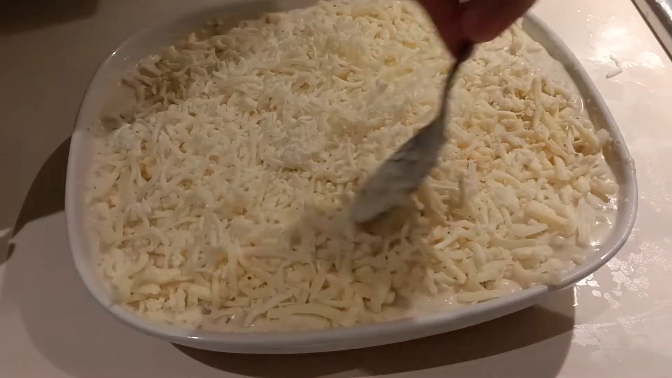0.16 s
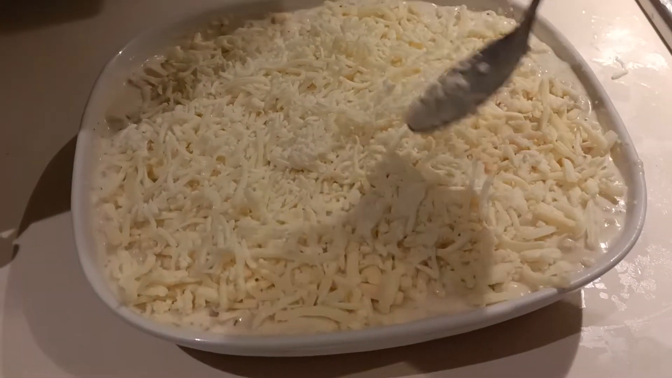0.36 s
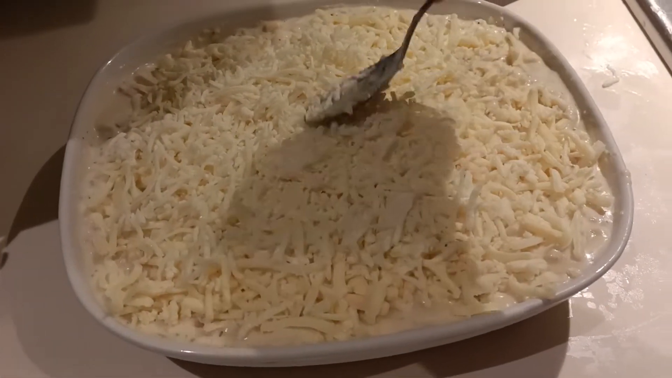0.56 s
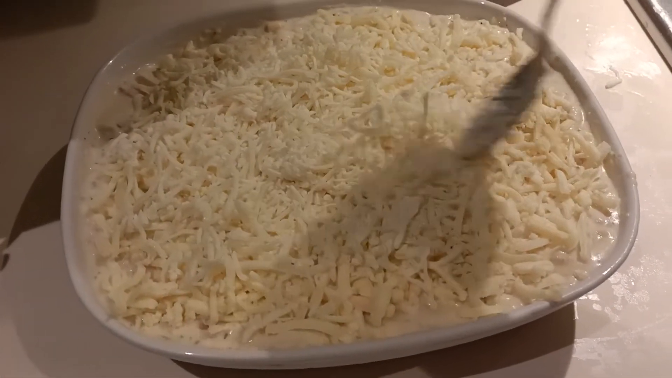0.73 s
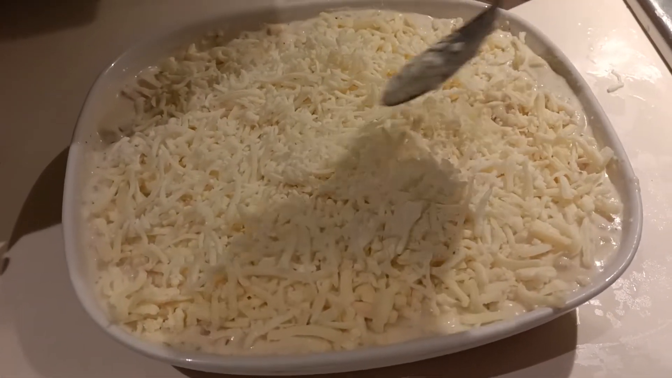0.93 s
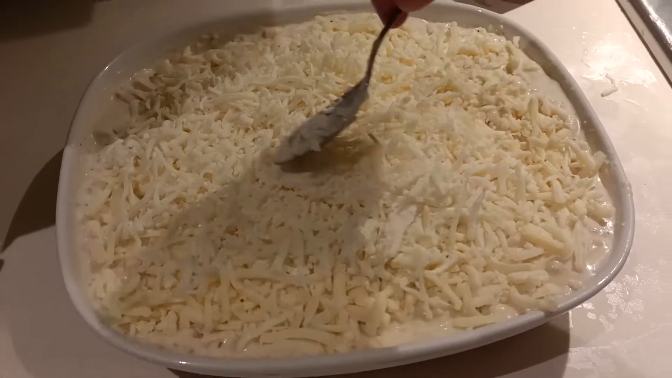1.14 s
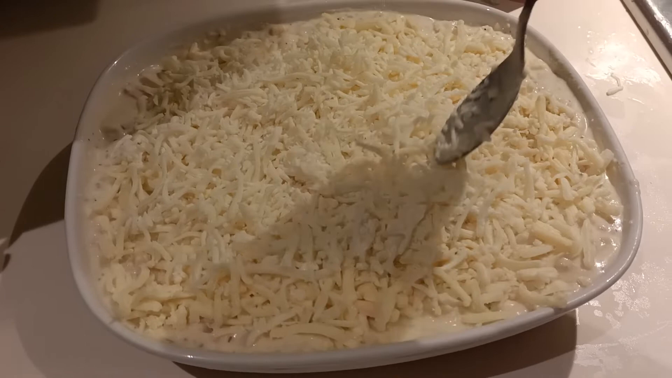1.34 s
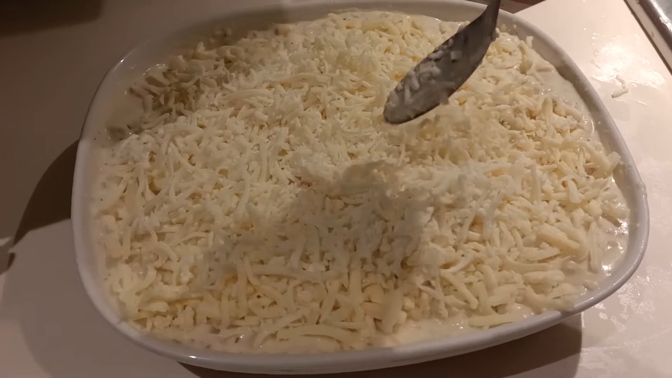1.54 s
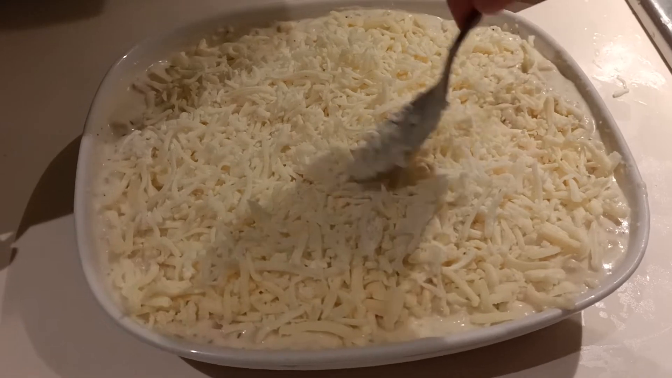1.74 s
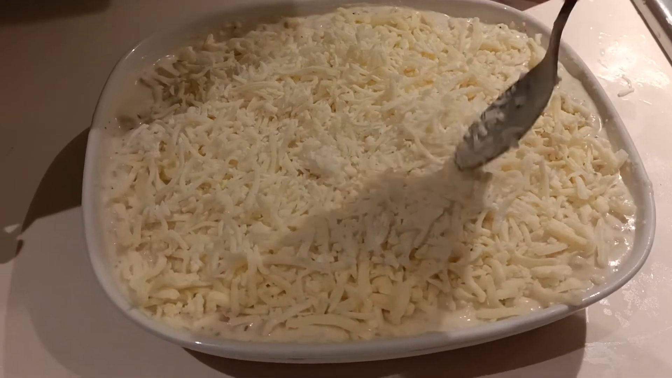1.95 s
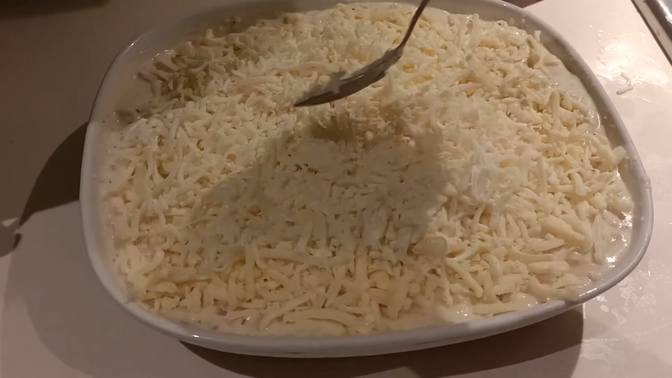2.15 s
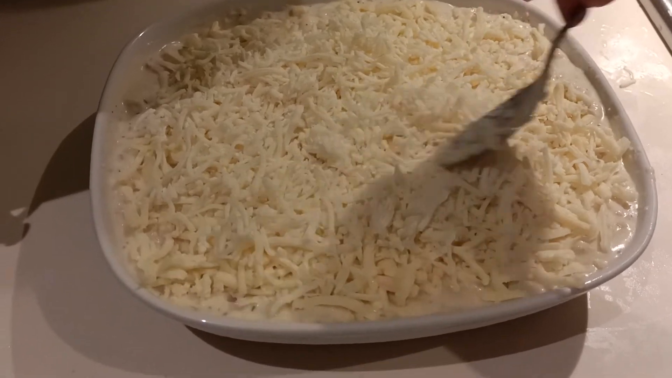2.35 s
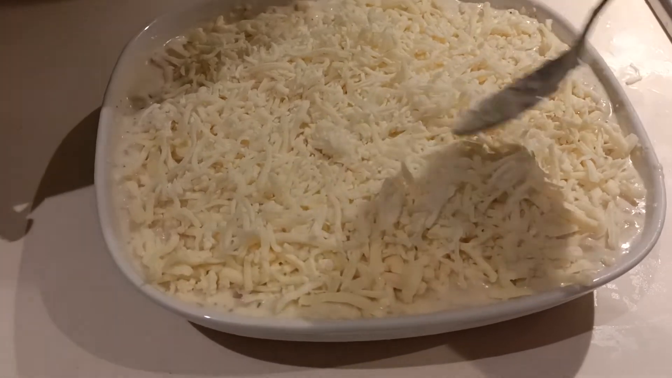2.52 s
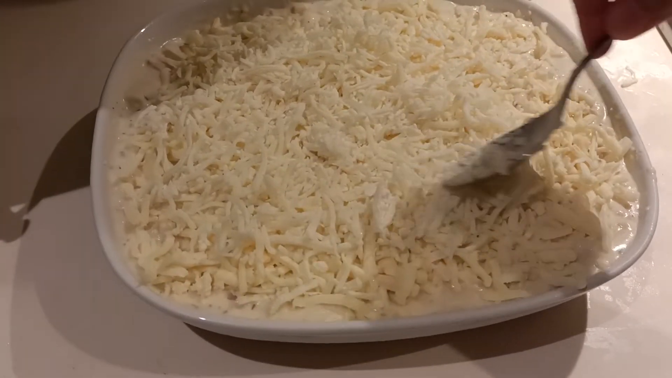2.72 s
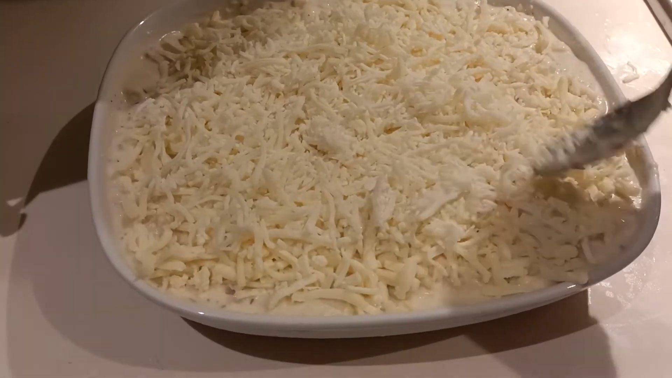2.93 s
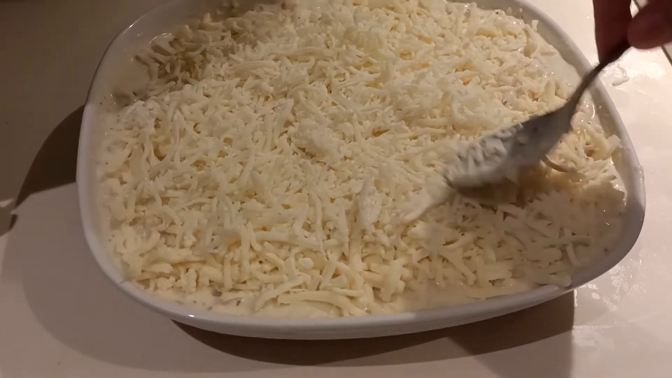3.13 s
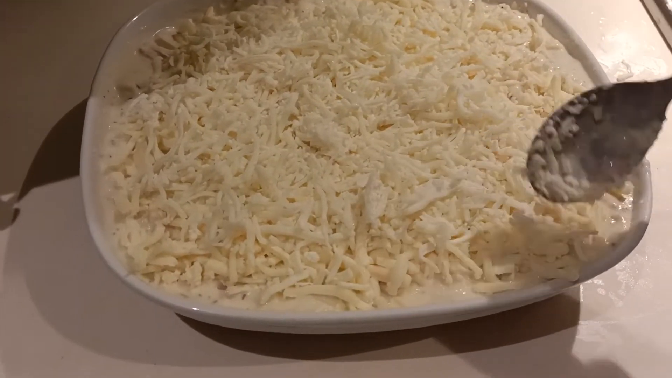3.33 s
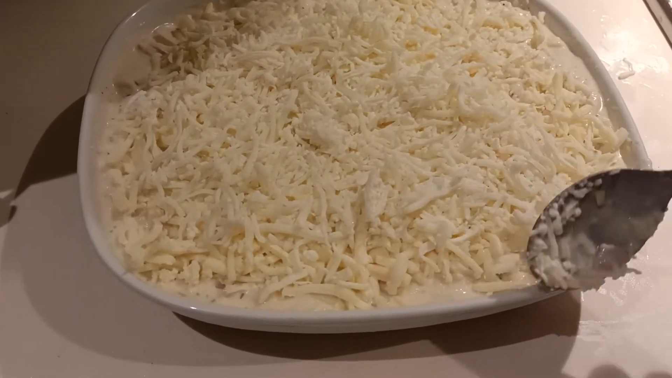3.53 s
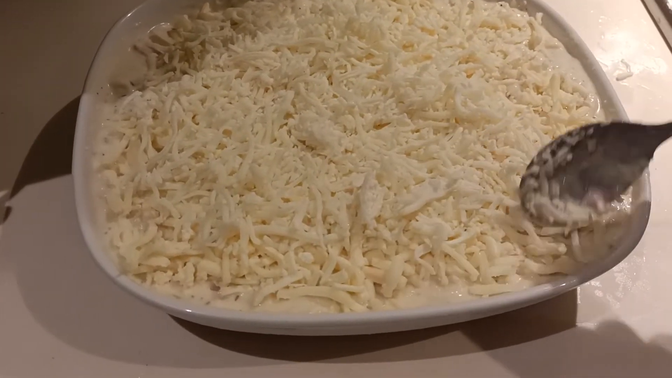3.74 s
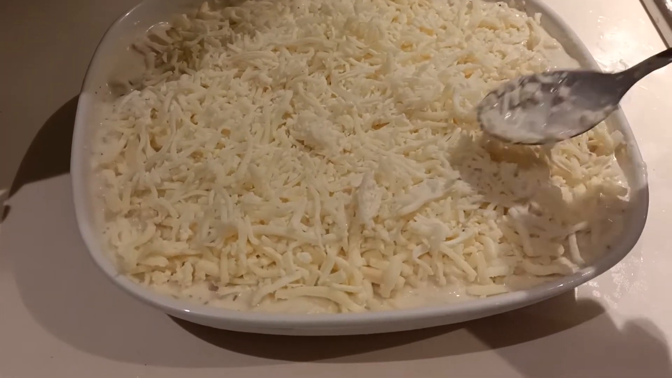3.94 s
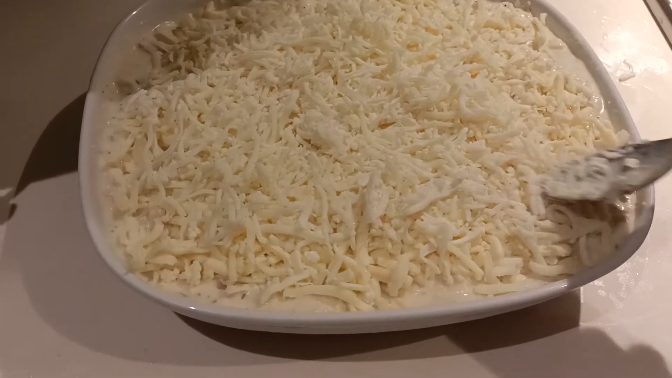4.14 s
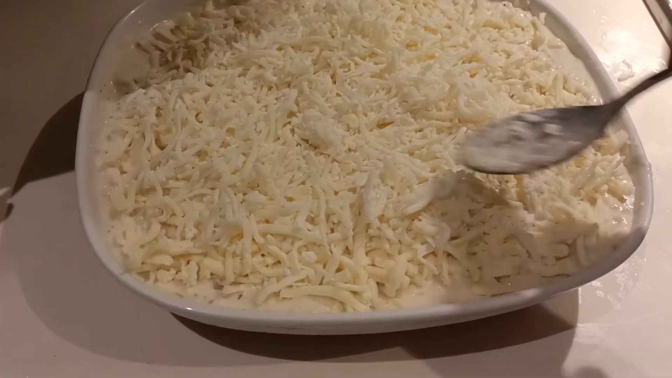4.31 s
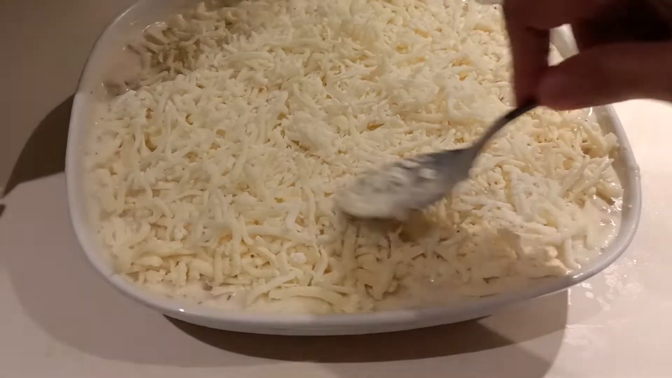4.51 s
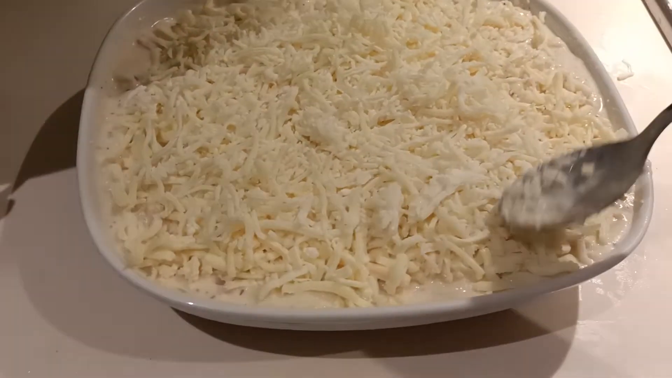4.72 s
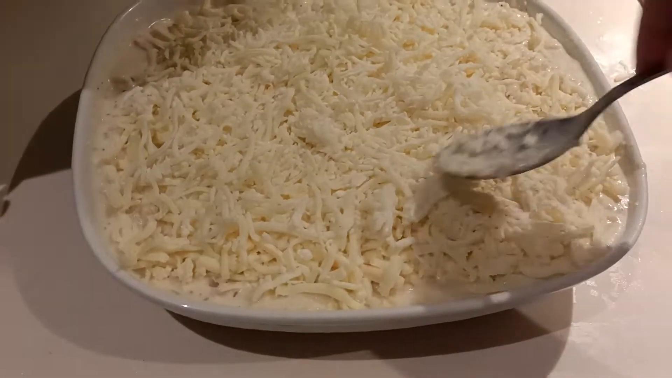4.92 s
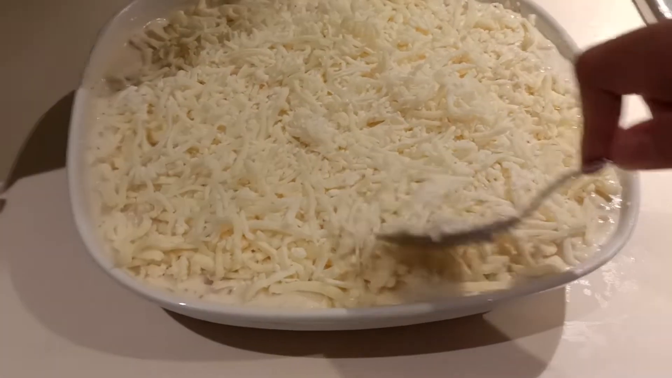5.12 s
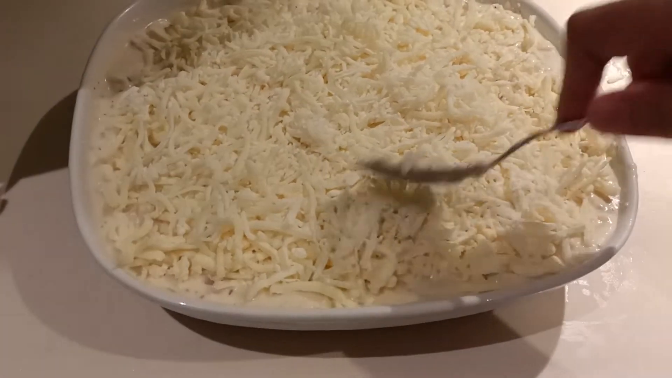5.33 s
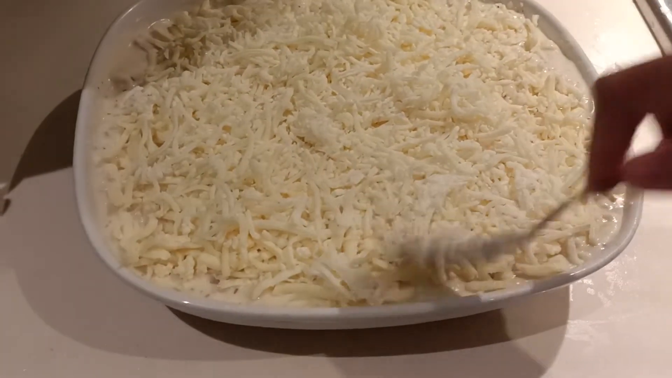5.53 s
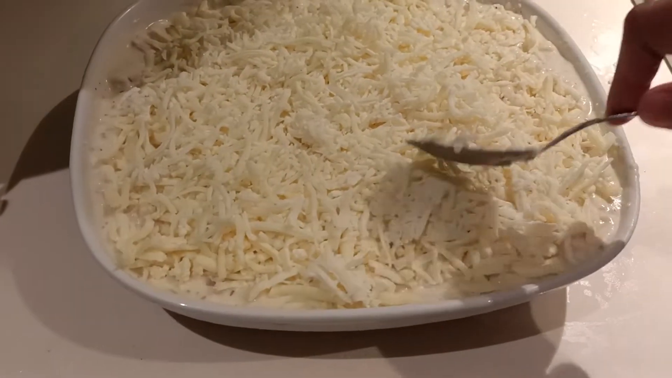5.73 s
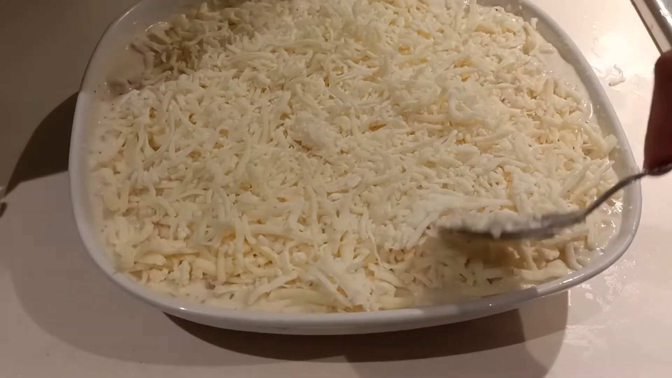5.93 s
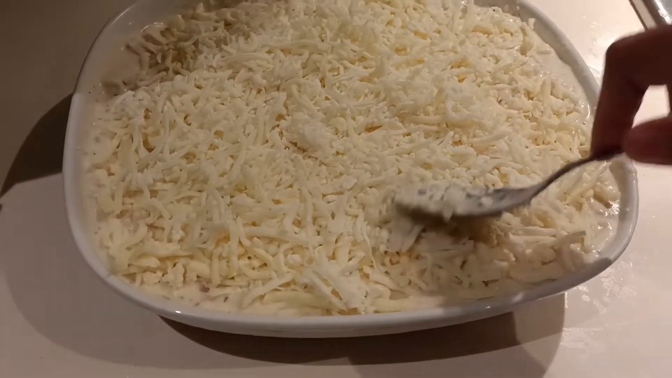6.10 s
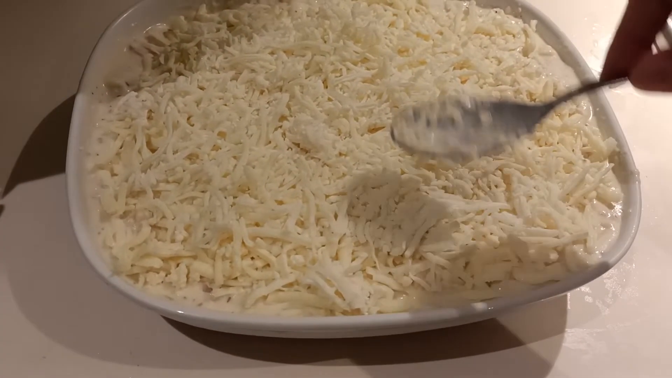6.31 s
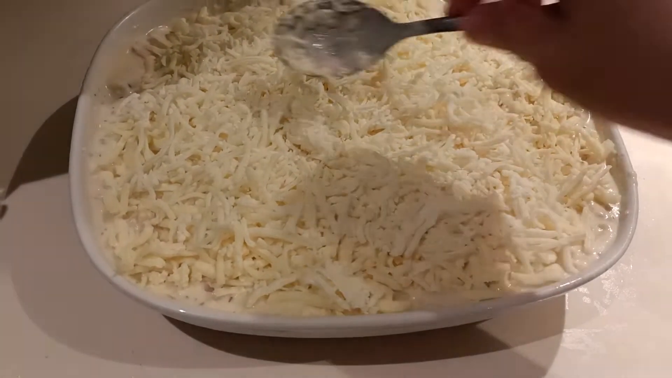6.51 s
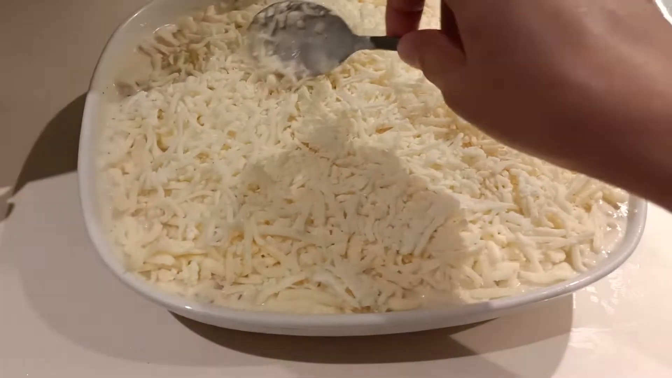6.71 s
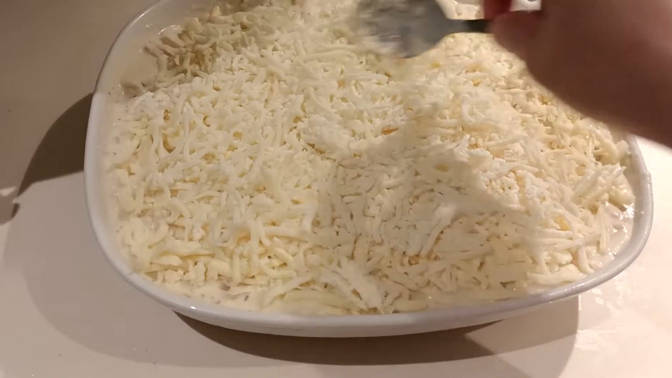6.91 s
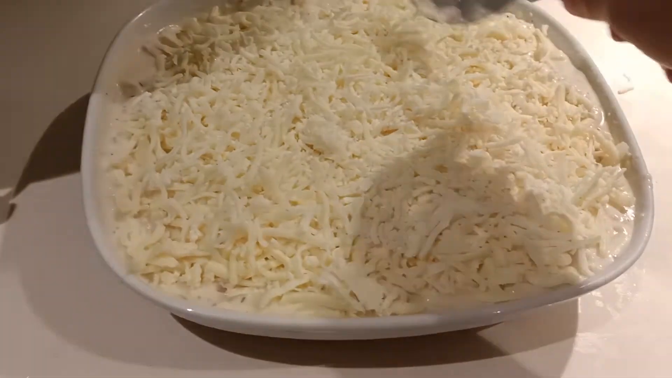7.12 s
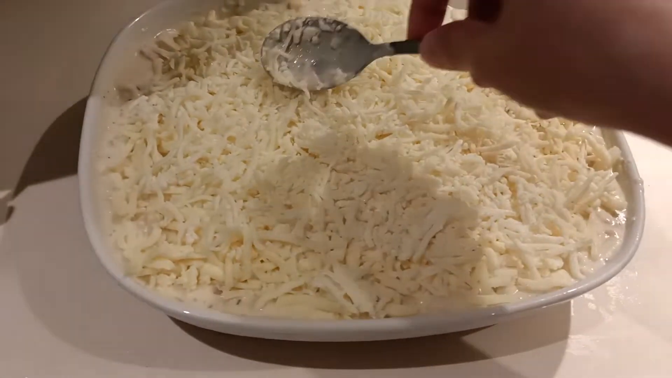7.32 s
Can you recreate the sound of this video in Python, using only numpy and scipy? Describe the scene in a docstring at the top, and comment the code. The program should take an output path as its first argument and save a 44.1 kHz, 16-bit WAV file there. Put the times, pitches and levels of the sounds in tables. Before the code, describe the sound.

A metal spoon softly taps and spreads grated cheese, clinks once on a ceramic dish, then a cupboard door bangs shut.

```python
"""A steel spoon spreads grated cheese in a ceramic baking dish: friction gives soft scrapes, cushioned
impacts give small ticks, and one sharp knock on the rim excites many damped modes.
Further off in the small kitchen, something like a cupboard door is unlatched and bangs shut, its panel
booming at low resonances amid a soft rustle of cloth. An appliance hums underneath.
Two microphones listen from close by."""
import sys
import numpy as np
from scipy import signal
from scipy.fft import rfft, irfft
from scipy.io import wavfile
from scipy.ndimage import uniform_filter1d

SR = 44100
rng = np.random.default_rng(int(sys.argv[2]) if len(sys.argv) > 2 else 0)


def file_out(sig):
    """Save sig as 16-bit WAV at sys.argv[1]."""
    # one column per channel
    cols = np.atleast_2d(sig).T
    # limit, then scale
    lim = np.clip(cols, -1, 1)
    pcm = np.round(lim * 32767).astype(np.int16)
    wavfile.write(sys.argv[1], SR, pcm)


N = 324576
TIME = np.arange(N) / SR


# resonances of the spoon bedded in cheese: pitch_hz, width_hz, gain_db
SPOON_MODES = [(3180, 45, 5.5), (5720, 160, 0), (6150, 96, 3), (7000, 270, -5), (7800, 130, -22.5),
               (9000, 190, 1), (9520, 170, -3), (9980, 200, -6), (10680, 240, 2), (11100, 110, -9),
               (11400, 150, -9), (13800, 300, -4.5)]
# spectrum of contact with cheese: frequency_hz, density_db
CHEESE_COLOUR = [(1500, -22), (3000, -15), (4000, -15), (5000, -14), (6200, 9.5), (8500, 9), (10800, -10),
                 (15000, -22)]
# light taps: start_s, relative_level_db, treble_db
TICKS = [(0.0337, -52, -15), (.18, -53, -3), (.611, -44, -3), (0.6497, -49, -18), (.672, -42, -7),
         (1.14, -47, 0), (1.1617, -37, -9), (1.203, -45, -13.5), (1.223, -45, -3), (1.6276, -53, -10),
         (1.6857, -54, -16), (1.8088, -57, 0), (2.164, -45, -14), (2.2381, -33, -3), (2.252, -32, 1),
         (2.6176, -46, -5), (2.7214, -48.5, -1), (2.755, -51, -3), (3.095, -58, -19), (3.962, -59, -15),
         (4.005, -53.5, -20), (4.0432, -57, -4), (4.101, -58, -20), (4.639, -54, -8)]
def ticks():
    """Cushioned impact: light spoon ticks through cheese, each with its own loudness and brightness."""
    out = np.zeros((2, N))
    contact = (fade(.023) + undb(-11.5) * fade(.18)) * (1 - fade(.0095))
    for start, db, treble_db in TICKS:
        spot_db = 1.5 * rng.standard_normal(len(SPOON_MODES))  # each spot favours different modes
        modes = [(hz, width, level + spot + .84 * (treble_db + 8.5) * (hz > 9000))
                 for (hz, width, level), spot in zip(SPOON_MODES, spot_db)]
        ring = resonate(white() * contact, modes)
        ring += .25 * noise(CHEESE_COLOUR) * contact
        snap = noise([(2800, -14), (4800, -10), (6200, 0), (15000, .6 * treble_db)]) * fade(.016)
        add(out, start, undb(db - 5.5) * (ring + undb(-1) * snap))
    return lean(out, 9.8)


# spectra of the first crack and of the dense modes: frequency_hz, density_db
CRACK_COLOUR = [(60, -5.5), (450, 3), (900, -1.5), (1300, -4), (2200, -6.5), (4000, -11), (8000, -14.5),
                (15000, -3.5)]
KNOCK_COLOUR = [(300, -15.5), (1200, -12.5), (2400, -20), (3100, -3.5), (4500, -0.5), (5600, -7.5),
                (7300, 0), (9300, -9), (11000, -2), (13300, -3.5), (15000, 1), (16000, -26)]
# ring of steel on the rim: pitch_hz, width_hz, gain_db
RIM_MODES = [(2600, 50, -9), (3210, 60, -9), (3670, 130, -8.5), (4470, 130, -4), (5080, 70, -12),
             (6140, 30, -3), (6430, 25, -6), (7320, 25, 0), (7505, 25, -3), (8320, 33, -1), (9518, 15, 0),
             (10270, 35, -6), (10870, 88.6, -0.5), (12200, 25, -7), (13350, 60, -2), (14720, 70, -2)]
# a knock and its rebound: start_s, level_db, relative_crack_db, cutoff_hz
KNOCKS = [(3.5536, -22, 15.5, 15200), (3.5842, -33, -14, 7500)]
def rim_knocks():
    """Hard impact: bare steel on the rim gives a broadband crack, damped modes and a reverberant tail."""
    out = np.zeros((2, N))
    # folding the cepstrum gives a minimum-phase pulse, its energy packed at the start
    cepstrum = irfft(np.log(gains(CRACK_COLOUR, 1024) + .01))[:512]
    crack = irfft(np.exp(rfft(np.r_[0, 2 * cepstrum[1:]], 1024)))
    for start, db, crack_db, cutoff_hz in KNOCKS:
        body = noise(KNOCK_COLOUR) * (undb(2) * fade(.035) + undb(-19) * fade(.24))
        strike = white() * (fade(.0061) + undb(-11) * fade(.21))
        body += undb(-.5) * resonate(strike, RIM_MODES)
        body[:, :len(crack)] -= lean(undb(crack_db) * crack / abs(crack).max(), 3)
        add(out, start, undb(db) * signal.lfilter(*signal.butter(2, cutoff_hz, fs=SR), body))
    return lean(out, 8)


# spectrum of loose shreds brushing the spoon: frequency_hz, density_db
DRAG_COLOUR = [(1500, -15), (3200, 0), (5000, -1), (7500, 0), (9500, -3), (15000, -12)]
# pats on the cheese: peak_s, relative_level_db, rise_s (negative for a sudden onset)
PATS = [(.04, -52.5, -0.2), (.18, -65.5, 5), (.665, -54.5, .22), (1.18, -50, 0.16), (1.65, -58.5, -0.67),
        (1.72, -61.5, 0.05), (2.175, -53.5, -0.22), (2.25, -51, -0.03), (2.73, -60.5, 0.23),
        (4.62, -64, -0.33)]
def shreds():
    """Granular friction: tiny random contacts crackle as the spoon presses and drags over the cheese."""
    grains_per_s, lift_s = 700, .088
    drag_until_s, drag_fall_s = 1.3, .8
    grains = (rng.random(N) < grains_per_s / SR) * rng.standard_normal(N)
    grains *= undb(1.1 * rng.exponential(size=N))
    grain_decay = white() * (fade(.006) + undb(-22) * fade(.15))
    crackle = unit(signal.fftconvolve(grains[None], grain_decay)[:, :N])
    damped = [(hz, 2 * width, db) for hz, width, db in SPOON_MODES]  # pressed cheese damps the modes
    pressed = undb(-10.5) * resonate(crackle, damped) + undb(-15) * tint(crackle, CHEESE_COLOUR)
    pressure = np.max([undb(db) * hump(peak, rise, lift_s) for peak, db, rise in PATS], axis=0)
    drag = undb(-80.5 - 20 * np.maximum(TIME - drag_until_s, 0) / drag_fall_s)
    return pressed * pressure + tint(crackle, DRAG_COLOUR) * drag


# cheese giving way: start_s, length_s, level_db, relative_thud_db
SQUASHES = [(0.167, 0.18, -60, 35), (0.75, 0.13, -59, 16.5), (0.877, 0.13, -67, 12), (1.33, 0.23, -73, 17),
            (1.762, 0.17, -68, 12), (1.92, .08, -73, 3), (2.042, 0.09, -71, -2), (2.704, 0.099, -68, 8),
            (2.92, 0.081, -66, 22)]
def squashes():
    """Soft deformation: squashed cheese gives a swell of noise with a low thud."""
    out = np.zeros((2, N))
    for start, length, db, thud_db in SQUASHES:
        colour = [(300, thud_db), (900, thud_db - 16.5), (1600, -14), (2400, -3), (7500, -7),
                  (10000, -13), (15000, -32)]
        add(out, start, undb(db) * swell(length) * noise(colour))
    return out


# wet squeaks on cheese, then faint singing of dish and spoon: start_s, length_s, pitch_hz, level_db
SQUEAKS = [(0.873, 0.11, 6650, -66.5), (.89, 0.081, 3850, -71), (1.031, 0.069, 6870, -59),
           (1.038, 0.14, 8200, -65), (2.205, 0.013, 7850, -55.5)]
RUBS = [(0.631, 0.091, 1346, -70.5), (.93, 0.098, 1310, -97), (1.07, .13, 1330, -77),
        (3.998, 0.025, 5560, -67), (4.63, 0.036, 5580, -71), (7.335, 0.026, 3230, -58.5)]
def rubbing():
    """Frictional excitation: narrow bands of noise squeak and sing; a thin hiss trails one stroke."""
    out = np.zeros((2, N))
    for start, length, hz, db in SQUEAKS:
        band = [(.83 * hz, -24), (hz, 0), (1.14 * hz, -22), (2 * hz, -50)]
        add(out, start, undb(db) * swell(length) * noise(band))
    for start, length, hz, db in RUBS:
        add(out, start, undb(db) * swell(length) * resonate(white(), [(hz, .0048 * hz, 0)]))
    hiss = noise([(6500, -32), (7050, 4), (7250, 4), (7500, -18), (8200, -38), (15000, -60)], N)
    return out + undb(-72) * hiss * hump(2.2, rise_s=.13, fall_s=1.2)


# soft bumps through the worktop: peak_s, level_db, pitch_hz
BUMPS = [(.785, -47.5, 45), (0.857, -46.5, 50), (2.708, -34, 60.3), (2.974, -42, 48.7), (3.015, -39, 58.5)]
def worktop():
    """Structure-borne sound: the worktop makes single damped swings under the pressing spoon."""
    return sum(undb(db) * -np.cos(2 * np.pi * hz * (TIME - peak)) * np.exp(-2 * hz * abs(TIME - peak))
               for peak, db, hz in BUMPS)


UNLATCH_S, SHUT_S = 5.598, 5.977
def door_swing():
    """Free vibration: the unlatched panel hums, pushes air ahead and shudders until the seal damps it."""
    hum_hz, hum_s = 72.4, .175
    hold_s, release_s = .41, .043
    out, t = np.zeros((2, N)), TIME[:SR]
    hum = np.sin(2 * np.pi * hum_hz * t) * np.sin(np.pi * np.minimum(t / hum_s, 1))
    add(out, UNLATCH_S, undb(-35.5) * hum)
    rumble = noise([(25, -8), (55, -4.5), (95, 1.5), (125, -11.5), (200, -27), (600, -63),
                    (4000, -100)], N)
    shudder = rumble[:, :SR] * (1 - fade(.16)) ** 2 * fade(1.5)
    seal = undb(-20 * np.maximum(t - hold_s, 0) / release_s)
    add(out, SHUT_S, undb(-24) * shudder * seal)
    air_push = undb(-39) * rumble * hump(SHUT_S - .047, rise_s=.056, fall_s=.069)
    return out + air_push


# spectra of unlatching and of shutting: frequency_hz, density_db
LATCH_COLOUR = [(290, -12.5), (500, -7), (716, -22.5), (1240, -11), (1370, -9), (2070, -5.5), (2800, -12),
                (3680, -4.5), (4570, -13.5), (7450, -15.5), (9650, -31), (13200, -26), (15500, -41)]
SLAM_COLOUR = [(150, -49), (250, -29), (359, -15), (450, -22), (499, -14.5), (809, -17.5), (882, -17.5),
               (1100, -23), (2200, -13.5), (3110, -17), (3760, -18.5), (4320, -19.5), (12200, -30),
               (14200, -36), (15500, -60)]
# ring of the metal catch: pitch_hz, width_hz, gain_db
CATCH_MODES = [(1330, 24, -4.5), (1460, 22, 2.5), (1750, 21, -7), (2270, 43, -1.5), (2480, 36, -1),
               (2910, 93, -2), (3120, 33, -2), (3530, 46, -5), (4000, 25, 0), (4160, 21, -7)]
# door contacts: start_s, level_db, t60_s
CLACKS = [(5.598, -33, 0.39), (5.615, -32.5, 0.27), (5.977, -30, 0.33), (5.994, -23.5, 0.38),
          (6.15, -42.5, 0.59)]
def door_clacks():
    """Reverberation: the impacts of latch and door arrive mostly as reflections from the walls."""
    out = np.zeros((2, N))
    for start, db, t60 in CLACKS:
        colour = LATCH_COLOUR if start < (UNLATCH_S + SHUT_S) / 2 else SLAM_COLOUR
        add(out, start, undb(db) * noise(colour) * fade(t60) * (1 - fade(.012)))
    for start, db in [(UNLATCH_S, -45.5), (SHUT_S, -52)]:  # bright spray of reflections
        add(out, start, undb(db) * noise(BRIGHT_COLOUR) * fade(.91))
    # the door shuts with a short bright snap and a metallic ring
    snap_colour = [(1500, -16), (2900, 0), (4200, -5.5), (12000, -48)]
    add(out, SHUT_S - .006, undb(-35) * noise(snap_colour) * swell(.02))
    add(out, SHUT_S + .00098, undb(-18.5) * noise(snap_colour) * fade(.023))
    add(out, SHUT_S + .002, undb(-22) * resonate(white() * fade(.2), CATCH_MODES))
    return lean(out, 2.4)


# hollow resonances of the wooden frame: pitch_hz, width_hz, gain_db
FRAME_MODES = [(293, 18, -4), (337.5, 14, -4), (367, 20, 0.5), (499, 18, -3)]
# panel and room modes: pitch_hz, gain_db, t60_s
PANEL_MODES = [(21.55, -13, 4), (31.8, -9, .8), (79, 5.5, 0.37), (94.12, -1.5, 0.9), (147, -15, 0.35),
               (302, -26.5, 0.87), (330, -25, .4), (359.5, -17.5, 0.23)]
# the bang and its rebounds: start_s, level_db
THUDS = [(5.985, -14.5), (6.181, -33), (6.249, -34)]
def door_boom():
    """Modal response: the frame knocks once, and each blow rings the low modes of panel and room."""
    out, t = np.zeros((2, N)), TIME[:SR]
    wood = noise([(190, 7), (260, .5), (350, 7), (500, 5.5), (720, -16), (1200, -14), (4000, -60)])
    wood += undb(1) * resonate(wood, FRAME_MODES)
    add(out, SHUT_S + .015, lean(undb(-32) * wood * fade(.37) * (1 - fade(.1)), -3.1))
    ring = sum(undb(db) * fade(t60) * -np.sin(2 * np.pi * hz * t) for hz, db, t60 in PANEL_MODES)
    for start, db in THUDS:
        add(out, start, undb(db) * ring * (1 - fade(.052)) ** 2 * (1 - t))
    return out


def door():
    """Path difference: under the clacks, the door's low sounds reach the left microphone later."""
    swing, clacks = door_swing(), door_clacks()
    low = swing + door_boom()
    low[0] = np.roll(low[0], 17)  # about 0.4 ms
    return clacks + lean(low, 2.7)


# spectra of sliding cloth (also of the door's reflections) and of swishes: frequency_hz, density_db
BRIGHT_COLOUR = [(880, -32), (1500, -36), (2260, -8), (2800, -13), (3150, 0), (3480, -4.5), (5890, 2.5),
                 (11800, -2), (15500, -9)]
SWISH_COLOUR = [(900, -13), (1700, -9), (2300, 2), (3200, 0), (4200, -4.5), (6000, -3.5), (9000, -6),
                (15000, -38)]
# sliding movements, as of a sleeve: peak_s, level_db, fall_s
SLIDES = [(5.242, -60, 0.17), (5.422, -54.5, 0.28), (5.753, -49.5, 0.24), (5.844, -52.5, 0.35),
          (6.19, -50, .3), (6.329, -52.5, .14), (6.49, -56.5, 0.18), (6.568, -58.5, 0.27),
          (6.69, -52.5, 0.27), (6.807, -46, 0.27), (7.058, -63, 0.88), (7.335, -58.5, .12)]
# fuller swishes: start_s, length_s, level_db
SWISHES = [(5.329, 0.44, -63.5), (5.399, .1, -49), (6.77, 0.13, -54), (6.873, 0.14, -62.5)]
def rustle():
    """Stick-slip friction: cloth hisses in overlapping slides, grainy as its weave catches and slips."""
    grain_db, grain_hz = .8, 179
    power = sum((undb(db) * hump(peak, .63 * fall, fall)) ** 2 for peak, db, fall in SLIDES)
    weave = unit(uniform_filter1d(rng.standard_normal(N), int(SR / grain_hz)))
    out = noise(BRIGHT_COLOUR, N) * np.sqrt(power)
    for start, length, db in SWISHES:
        add(out, start, undb(db) * swell(length) * noise(SWISH_COLOUR))
    return lean(out * undb(grain_db * weave), 4.1)


# spectra of the appliance's rumble and of the airy hiss: frequency_hz, density_db
RUMBLE_COLOUR = [(12, -34), (20, -8), (43, -3), (69, -15.5), (82, -4), (103, -2), (125, -7.5), (188, -7),
                 (208, -11.5), (222, -16.5), (257, -15.5), (293, -6.5), (471, -12), (555, -13.5),
                 (1000, -28), (1300, -54), (2200, -120)]
HISS_COLOUR = [(590, -43), (1000, -3), (1920, -8), (2230, -4.5), (2590, -6.5), (3410, -8), (7530, -14.5),
               (9150, -15.5), (15500, -17.5)]
# slow drift of the hiss: time_s, relative_level_db
HISS_LEVELS = [(0.0, -70.5), (1.76, -73.5), (2.57, -72), (4.33, -75.5), (5.15, -72.5)]
def kitchen():
    """Ambient noise: an appliance rumbles and hums at harmonics of the mains, under a diffuse hiss."""
    rumble = undb(-56.5) * noise(RUMBLE_COLOUR, N)
    hum = sum(undb(db) * np.sin(2 * np.pi * hz * TIME)
              for hz, db in [(100, -59.5), (200, -72), (300, -68)])
    hiss_db = 6 + np.interp(TIME, *np.transpose(HISS_LEVELS))
    return rumble + hum + lean(undb(hiss_db) * noise(HISS_COLOUR, N), 1.4)


def undb(db):
    """Amplitude ratio of a level in decibels."""
    return 10 ** (np.asarray(db) / 20)


def unit(x):
    """Normalisation to rms 1."""
    return x / np.sqrt(np.mean(x ** 2))


def gains(colour, size):
    """Spectral envelope: a colour's gain at every bin, falling steeply below its first point."""
    hz, db = np.transpose(colour)
    f = np.maximum(np.arange(size // 2 + 1) * SR / size, 1)
    return undb(np.interp(np.log(f), np.log(hz), db)) * np.minimum(f / hz[0], 1) ** 3


def tint(x, colour):
    """Spectral shaping by a colour, at rms 1."""
    size = x.shape[-1]
    return unit(irfft(rfft(x) * gains(colour, size), size))


def white():
    """One second of white noise, uncorrelated between the channels."""
    return rng.standard_normal((2, SR))


def noise(colour, size=SR, apart_hz=850):
    """Diffuse field: long waves of coloured noise reach both microphones alike, short ones differ."""
    mid, side = rng.standard_normal((2, size))
    f = np.arange(size // 2 + 1) * SR / size
    side = irfft(rfft(side) * np.minimum(f / apart_hz + .12, 1), size)
    return tint(np.array([mid + side, mid - side]), colour)


def resonate(x, modes):
    """Resonance: parallel second-order modes filter x, keeping its energy."""
    size = x.shape[-1]
    f = np.arange(size // 2 + 1) * SR / size
    response = sum(undb(db) * 1j * f * width / (hz ** 2 - f ** 2 + 1j * f * width)
                   for hz, width, db in modes)
    return x.std() * unit(irfft(rfft(x) * response, size))


def fade(t60_s):
    """Exponential decay, one second long, losing 60 dB in t60_s."""
    return np.exp(-np.log(1000) * TIME[:SR] / max(t60_s, .001))


def swell(length_s):
    """One-second envelope that rises and falls within length_s."""
    return np.sin(np.pi * np.minimum(TIME[:SR] / length_s, 1) ** .52)


def hump(peak_s, rise_s, fall_s):
    """Exponential growth and decay: 20 dB down one rise before the peak and one fall after."""
    return undb(-20 * np.maximum((peak_s - TIME) / max(rise_s, .001), (TIME - peak_s) / max(fall_s, .001)))


def lean(x, right_db):
    """Level difference in favour of the right microphone."""
    return x * undb(np.array([[-right_db], [right_db]]) / 2)


def add(out, start_s, x):
    """Superpose x on out from start_s."""
    i = max(int(start_s * SR), 0)
    out[:, i:i + x.shape[-1]] += x[..., :max(N - i, 0)]


def scene():
    """Superposition: spoon and cheese close by, then door, cloth and kitchen."""
    spoon = ticks() + rim_knocks()
    cheese = lean(shreds() + squashes() + rubbing(), 13.8)
    return spoon + cheese + worktop() + door() + rustle() + kitchen()


def record(dry):
    """Band limiting: a steep elliptic low-pass removes the highest treble."""
    cutoff_hz = 15700
    return signal.sosfilt(signal.ellip(8, .2, 70, cutoff_hz, fs=SR, output="sos"), dry)


dry = scene()
out = record(dry)
file_out(out)
```